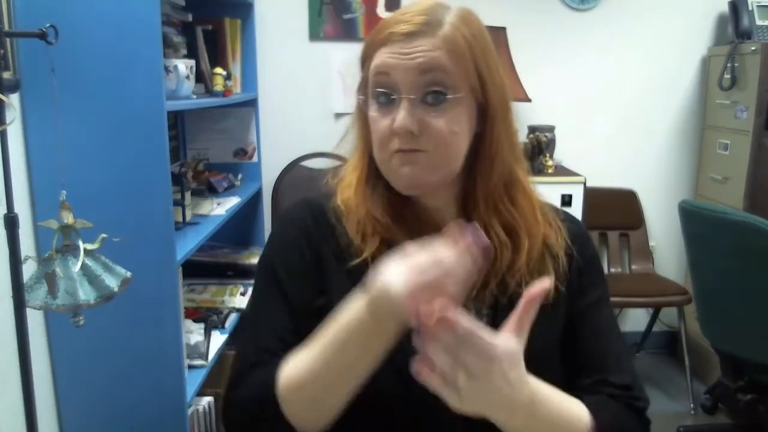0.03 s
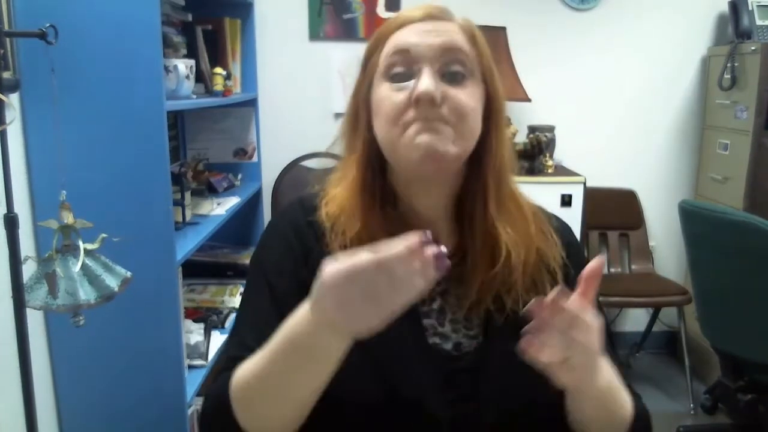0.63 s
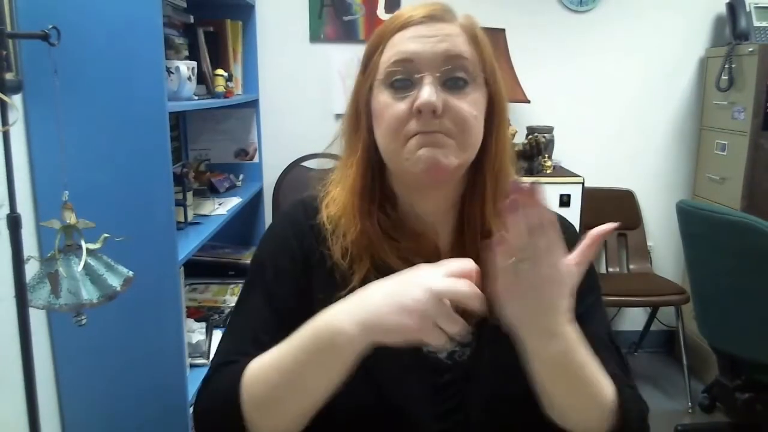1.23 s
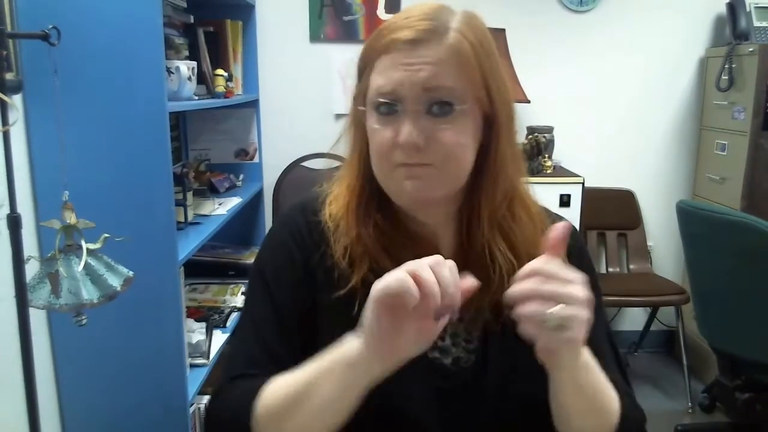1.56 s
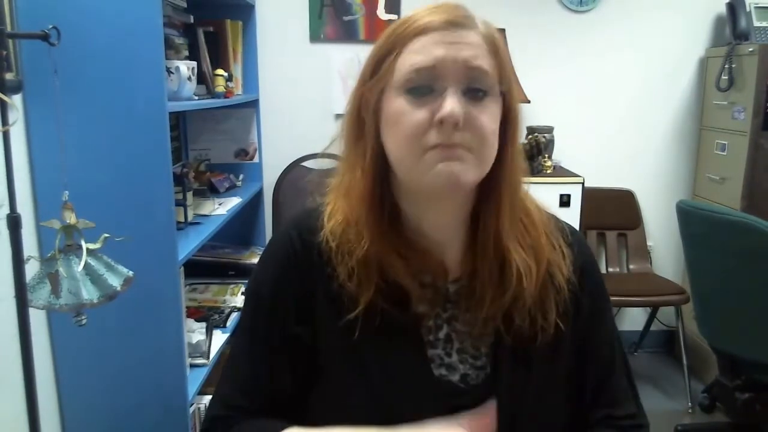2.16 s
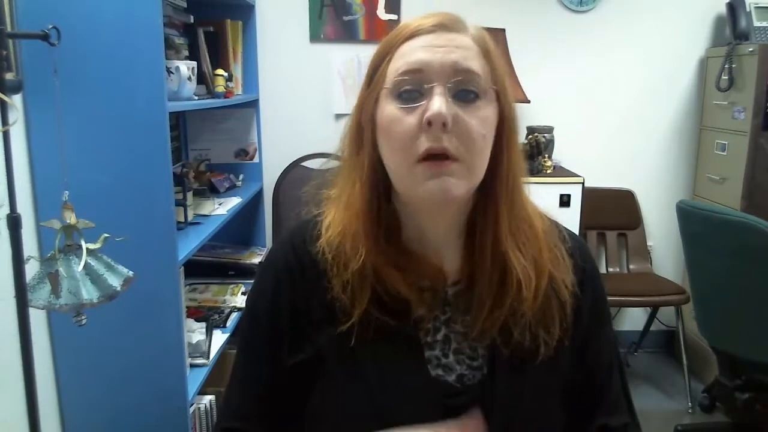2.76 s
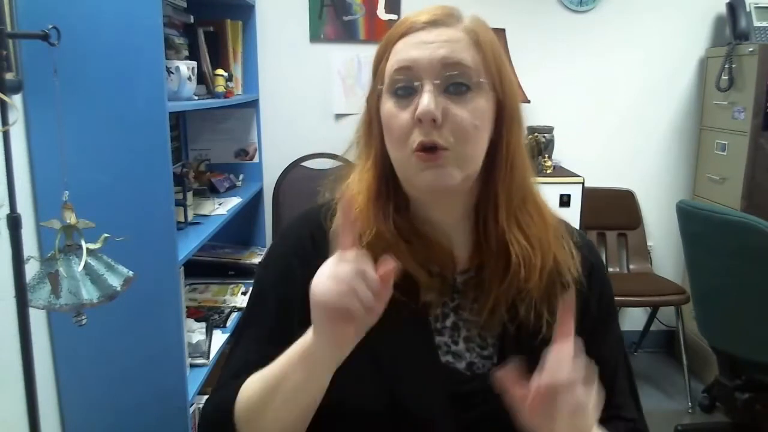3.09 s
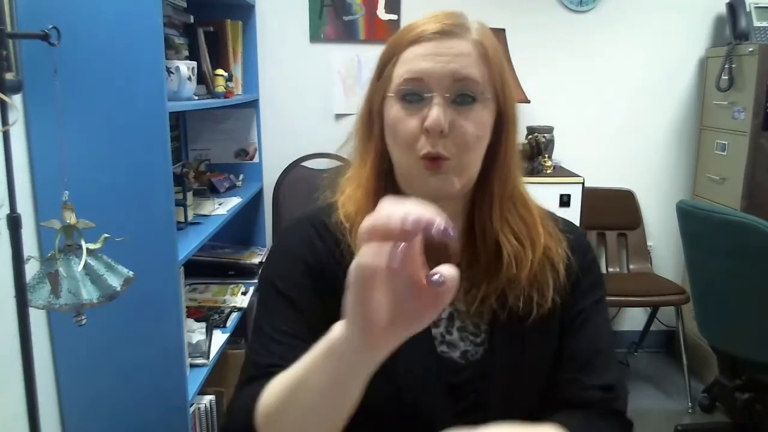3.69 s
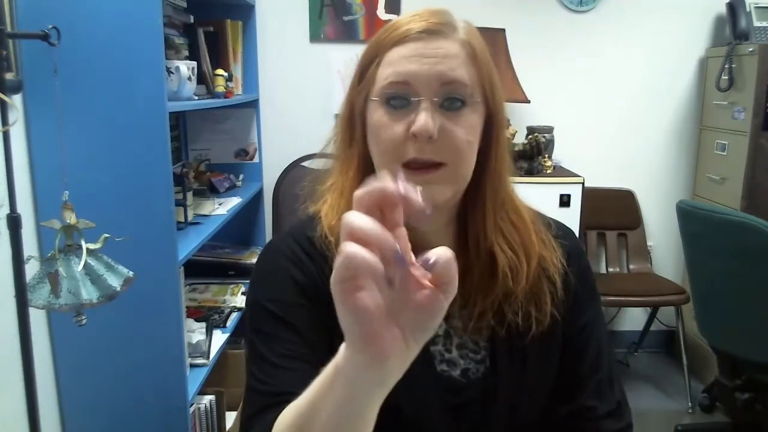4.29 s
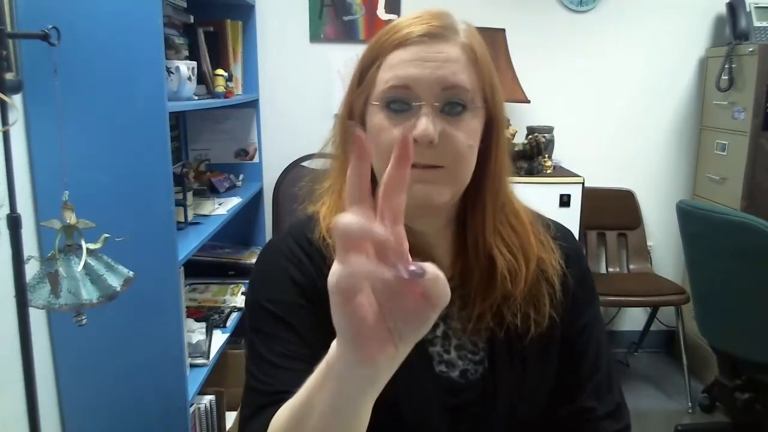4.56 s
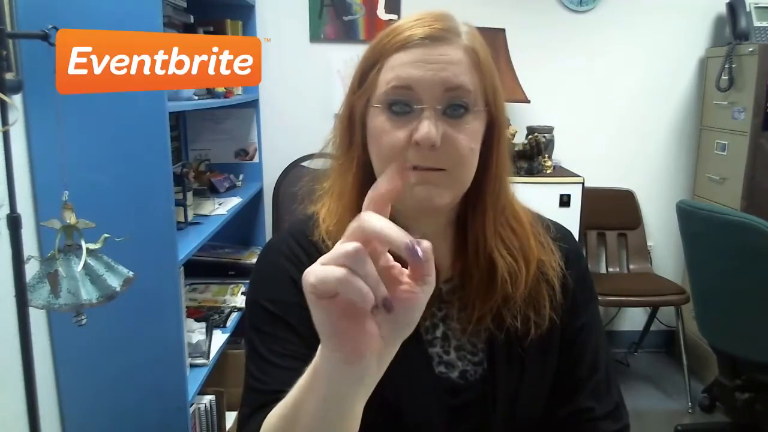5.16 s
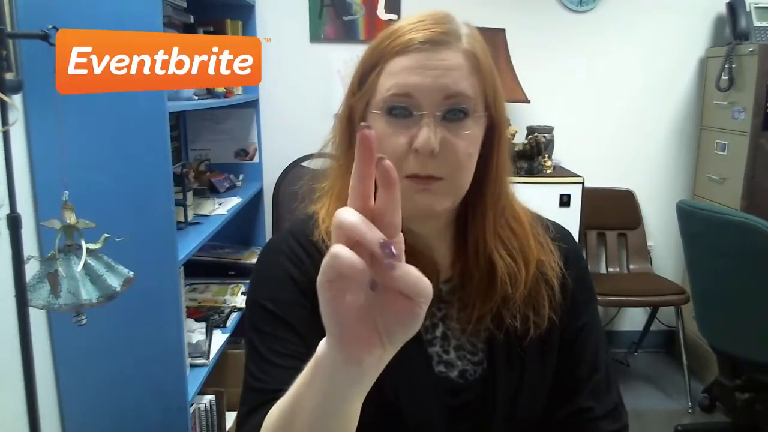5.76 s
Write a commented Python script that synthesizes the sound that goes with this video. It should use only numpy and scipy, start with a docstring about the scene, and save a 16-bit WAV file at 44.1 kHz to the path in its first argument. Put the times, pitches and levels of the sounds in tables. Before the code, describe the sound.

Soft hand pats, sleeve brushes and small wet lip clicks from someone signing in a quiet office, over ventilation rumble.

```python
"""Someone signs in a small, quiet office, close to a computer microphone. Ventilation rumble, hiss and a
thin electronic whine run throughout. Hands brush and pat together first; near 1 s lips and tongue part
with small wet clicks. Arms bump softly, and more clicks come around 2.6 s. A bright brush at 3.4 s
leads to the firmest pat and the loudest click at 3.8 s. Soft bumps and faint clicks follow, then a last
pat and brush near 6 s. The room answers each sound briefly."""
import sys
import numpy as np
from scipy import signal
from scipy.fft import rfft, irfft, next_fast_len
from scipy.io import wavfile
from scipy.ndimage import map_coordinates

SR = 44100
rng = np.random.default_rng(int(sys.argv[2]) if len(sys.argv) > 2 else 0)


def to_wav(s):
    """Save 16-bit WAV."""
    ch = np.atleast_2d(s).T  # columns
    pcm = np.round(np.clip(ch, -1, 1) * 32767)  # PCM
    wavfile.write(sys.argv[1], SR, pcm.astype(np.int16))


N = 265905

# Lip and tongue clicks. Each row: start in seconds, level in dB, cavity pitch and width in Hz,
# first tear in dB against the click, hollow ring in dB against the cavity.
MOUTH_CLICKS = [(0.959, -31.5, 2540, 2200, -15, 4), (0.9958, -43, 2500, 1610, -13, 6),
                (2.5695, -20.5, 6030, 1430, -6, -14), (2.635, -30.5, 3620, 1210, -23, -34),
                (2.673, -39.5, 3300, 1310, -22, 8), (3.4242, -30, 7630, 700, -20, -33),
                (3.8184, -15, 4580, 1750, 1, -20), (4.002, -33.5, 4350, 2020, -9, -25),
                (5.385, -51.5, 6036, 1800, -7, -28), (5.483, -48, 3970, 590, -18, -30),
                (5.497, -45, 5650, 1110, -3, -28)]
# Tone of a wet film breaking; it also colours the brush fizz. Each row: frequency in Hz, level in dB.
SNAP_EQ = [(150, -16), (700, -3.5), (2200, -2), (5000, 2.5), (9000, -5), (12000, -11), (15500, -21.5)]
# Soft contacts of hands and arms. Each row: time in seconds, level in dB, centre pitch in Hz.
HAND_PATS = [(.187, -31, 280), (0.192, -31.5, 162), (.207, -38.5, 380), (0.314, -48.5, 219),
             (1.003, -52.5, 165), (1.067, -49, 146), (1.196, -50.5, 148), (1.36, -50, 199),
             (1.817, -44, 151), (1.887, -50, 151), (2.225, -35.5, 180), (2.2399, -36, 175),
             (2.391, -50.5, 178), (2.476, -45.5, 267), (2.696, -47, 180), (2.788, -43, 122),
             (2.826, -45.5, 163), (3.075, -50, 134), (3.383, -46.5, 128), (3.448, -51.5, 121),
             (3.496, -46.5, 127), (3.7997, -27.5, 490), (3.812, -34, 308), (3.8193, -25.5, 482),
             (3.889, -44.5, 127), (4.127, -45, 118), (4.314, -43, 119), (4.345, -47.5, 127),
             (4.528, -48, 177), (4.915, -46, 147), (5.537, -50, 135), (5.877, -46.5, 129),
             (5.944, -50.5, 128), (5.973, -44, 476)]
# A pat's light touch, push and settling flesh. Each row: offset in seconds, level in dB, pitch ratio.
PAT_STAGES = [(-.006, -14, .85), (0, 0, 1), (.016, -9, .88)]
# Skin and sleeve strokes. Each row: peak time and rise in seconds, level in dB, centre and width in Hz.
BRUSH_STROKES = [(.005, .013, -44, 2830, 3300), (.24, 0.11, -64.5, 720, 597), (.46, 0.021, -64.5, 560, 248),
                 (0.538, 0.0094, -59, 930, 240), (0.582, 0.39, -75.5, 4500, 4340),
                 (1.083, 0.0068, -54.5, 6500, 5500), (1.115, 0.011, -67, 7560, 5500),
                 (1.242, .008, -60, 6900, 5200), (3.427, 0.011, -47.5, 6900, 2700),
                 (3.443, 0.0059, -51.5, 3820, 2090), (3.466, 0.0096, -60.5, 660, 376),
                 (5.976, .006, -61.5, 2100, 4500)]
# Standing waves of the office. Each row: pitch in Hz, relative level in dB, seconds to fall 60 dB.
STANDING_WAVES = [(128.7, -4.5, 0.204), (192, -13, 0.187), (259, -10.5, 0.81), (347, 7.5, 0.16),
                  (501, 5, 0.081), (518, -25, 0.165), (783, -11, 0.091), (1214, -3, 0.153)]
# Length of the room's tail. Each row: frequency in Hz, seconds to fall 60 dB.
TAIL_DECAY = [(120, 0.14), (500, 0.15), (1500, 0.15), (4500, 0.11), (9000, 0.14), (15000, 0.093)]
# Tone of the ventilation. Each row: frequency in Hz, relative level in dB.
RUMBLE_EQ = [(12, -80), (20, -58), (37, -51), (53, -13), (123, 6.5), (165, -3), (304, -1), (343, -0.5),
             (435, -6), (560, -16), (700, -20), (910, -8), (1540, -120)]
# Tone of the hiss. Each row: frequency in Hz, relative level in dB.
HISS_EQ = [(290, -10.5), (500, -3), (919, -4), (1210, -3), (1400, -6.5), (2160, -8.5), (4150, -15),
           (4600, -17), (4800, -16.5), (5550, -17.5), (7310, -25), (8210, -30), (8580, -26.5), (11800, -28),
           (16000, -54)]
# Whine of the electronics. Each row: pitch in Hz, rms level in dB.
WHINE_TONES = [(2223, -84), (2245, -94.5), (4468, -84.5), (5356, -89), (5755, -90), (5776, -91),
               (6691, -91), (8000, -91)]


def mouth_clicks(lead_s=0.001, hollow_hz=1945, hollow_width_hz=240):
    """Lips or tongue part: a wet film tears, then snaps, ringing a small cavity and the hollow behind."""
    out = np.zeros(N)
    tear = pulse(lambda hz: amp(along(SNAP_EQ, hz)))
    for s, db, cavity_hz, width_hz, tear_db, hollow_db in MOUTH_CLICKS:
        # a smaller cavity, nearer the lips, lets more snap out: 6 dB per octave
        snap_db = -19 + 6 * np.log2(cavity_hz / 4530)

        def tone(hz):
            hollow = amp(hollow_db) * hump(hz, hollow_hz, hollow_width_hz)
            ring = np.hypot(hump(hz, cavity_hz, width_hz), hollow)
            return np.hypot(ring, amp(snap_db + along(SNAP_EQ, hz)))

        for start, sound in (s - lead_s, amp(tear_db) * tear), (s, pulse(tone)):
            add(out, start, amp(db) * office(sound, early_db=-3.5, tail_db=-2.5))
    return out


def hand_pats(standing_db=-55, size=2048):
    """Flesh meets flesh in three quick pushes, which set standing waves going between the walls."""
    out = np.zeros(N)
    for s, db, centre_hz in HAND_PATS:
        for offset_s, stage_db, ratio in PAT_STAGES:
            thud = office(push(centre_hz * ratio, size), early_db=-10.5, tail_db=-4)
            add(out, s + offset_s - size / 2 / SR, amp(db + stage_db) * thud)
    t = np.arange(SR // 3) / SR
    standing = sum(amp(db - 60 * t / t60) * np.cos(2 * np.pi * hz * t) for hz, db, t60 in STANDING_WAVES)
    return out + amp(standing_db) * signal.fftconvolve(out, standing)[:N]


def push(centre_hz, size, skin_db=-52):
    """One dull push that swells and lets go, peak 1, about size / 2 samples in."""
    hz = np.fft.rfftfreq(size, 1 / SR)
    octaves = 0.6 + 0.61 * np.log2(centre_hz / 123.85)  # a firmer contact is higher and wider in pitch
    spread = 2 ** (octaves / 2)
    low_hz, high_hz = centre_hz / spread, centre_hz * spread
    flesh = 1 / np.sqrt(1 + (hz / high_hz) ** 10)
    skin = amp(skin_db) / (1 + (hz / 4000) ** 2)
    force = np.fft.fftshift(irfft(flesh + skin))
    # a hand is too small to radiate the deepest part of the push
    low_cut = pulse(lambda f: 1 / np.sqrt(1 + (low_hz / (f + 1)) ** 8))
    sound = signal.fftconvolve(force, low_cut)
    return sound / np.abs(sound).max()


def brushes(grain_db=3.5, fall_ratio=1.36):
    """Skin and cloth slide: grainy friction noise that swells and fades with each stroke."""
    out, t = np.zeros(N), np.arange(N) / SR
    for s, rise, db, centre_hz, width_hz in BRUSH_STROKES:
        stroke = np.exp(-np.where(t < s, ((t - s) / rise) ** 2, (t - s) / (fall_ratio * rise)))
        fizz_db = -20 + 7 * np.log2(centre_hz / 2980)  # brighter strokes fizz more: 7 dB per octave
        fizz = lambda hz: amp(fizz_db + along(SNAP_EQ, hz))
        friction = noise(lambda hz: np.hypot(hump(hz, centre_hz, width_hz), fizz(hz)))
        out += amp(db) * stroke * friction
    catching = unit(amp(grain_db * wobble(700)))  # the surfaces catch and slip
    return office(out * catching, early_db=-13, tail_db=-10)[:N]


def office(x, early_db, tail_db, early_t60=0.014):
    """Direct sound, quick scatter off the desk and screen, then the short tail of the room."""
    t = np.arange(SR // 3) / SR
    hz, frame_s, spectrum = signal.stft(rng.standard_normal(len(t)), SR, nperseg=256)
    decay = amp(-60 * frame_s / along(TAIL_DECAY, hz)[:, None])
    tail = signal.istft(spectrum * decay, SR, nperseg=256)[1][:len(t)]
    tail *= 1 - np.exp(-t / 0.00092)  # soften the attack
    early = rng.standard_normal(len(t)) * amp(-60 * t / early_t60) * (t > .0006)
    answer = amp(early_db) * early / np.linalg.norm(early) + amp(tail_db) * tail / np.linalg.norm(tail)
    answer[0] += 1  # the direct sound
    return signal.fftconvolve(x, answer)


def room_tone(rumble_db=-63.5, flutter_db=3.3, hiss_db=-70):
    """The bed: fluttering ventilation rumble, steady hiss and the whine of the electronics."""
    t = np.arange(N) / SR
    air = noise(lambda hz: amp(along(RUMBLE_EQ, hz)) / (1 + (hz / 520) ** 10))
    rumble = amp(rumble_db + flutter_db * wobble(30)) * air
    hiss = amp(hiss_db) * noise(lambda hz: amp(along(HISS_EQ, hz)))
    whine = sum(amp(db) * np.sqrt(2) * np.sin(2 * np.pi * hz * t + 0.12 * wobble(3.3))
                for hz, db in WHINE_TONES)
    return rumble + hiss + whine


def amp(db):
    """Decibels to gain."""
    return 10 ** (np.asarray(db) / 20)


def unit(x):
    """Scale to rms 1."""
    return x / np.sqrt(np.mean(x ** 2) + 1e-20)


def along(points, hz):
    """Read a curve of (Hz, value) points on a log frequency axis."""
    point_hz, values = np.transpose(points)
    return np.interp(np.log(hz + 1), np.log(point_hz + 1), values)


def wobble(rate):
    """A smooth random curve, rate knots a second."""
    knots = rng.standard_normal(int(N * rate / SR) + 4)
    return map_coordinates(knots, [np.arange(N) * rate / SR])


def filtered(x, response):
    """Equalise x by response, a gain for each frequency."""
    size = next_fast_len(N + SR // 2)
    return irfft(rfft(x, size) * response(np.fft.rfftfreq(size, 1 / SR)), size)[:N]


def noise(response):
    """Coloured noise of rms 1."""
    return unit(filtered(rng.standard_normal(N), response))


def hump(hz, centre_hz, width_hz):
    """Gain of a broad resonance with steep skirts."""
    detune = (hz ** 2 - centre_hz ** 2) / ((hz + 1) * width_hz)
    return 1 / np.sqrt(1 + detune ** 6)


def pulse(response, size=8192):
    """The tightest causal pulse with this spectrum, peak 1."""
    gain = np.maximum(response(np.fft.rfftfreq(size, 1 / SR)), 1e-6)
    cepstrum = irfft(np.log(gain))
    cepstrum[1:size // 2] *= 2  # fold to minimum phase
    cepstrum[size // 2 + 1:] = 0
    sound = irfft(np.exp(rfft(cepstrum)))
    return sound / np.abs(sound).max()


def add(track, s, sound):
    """Mix a sound in at s seconds."""
    start = max(round(s * SR), 0)
    track[start:start + len(sound)] += sound[:N - start]


def scene():
    """Mouth, hands and room tone meet at one microphone."""
    return (mouth_clicks() + hand_pats() + brushes() + room_tone())[None]


def record(dry, top_hz=15900):
    """The recorder cuts the treble steeply at its band limit."""
    return np.array([filtered(channel, lambda hz: 1 / (1 + (hz / top_hz) ** 70)) for channel in dry])


dry = scene()
out = record(dry)
to_wav(out)
```